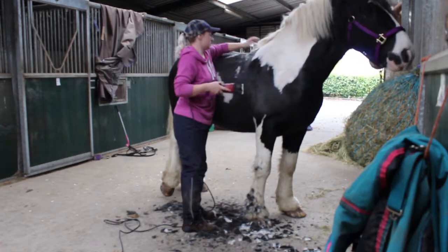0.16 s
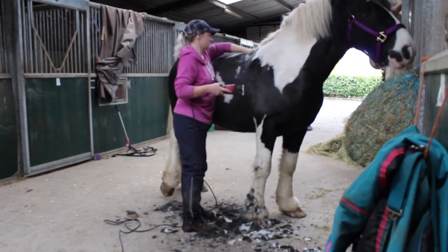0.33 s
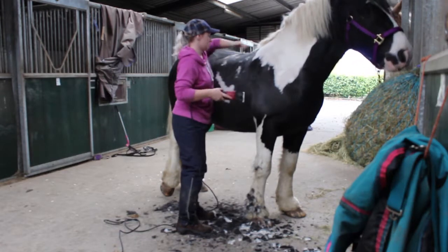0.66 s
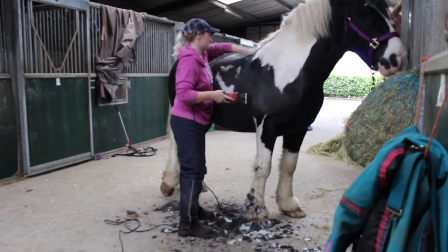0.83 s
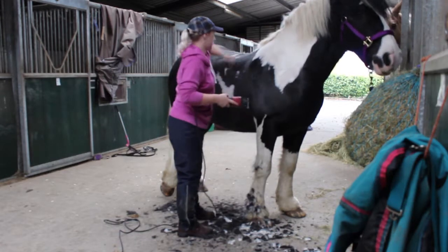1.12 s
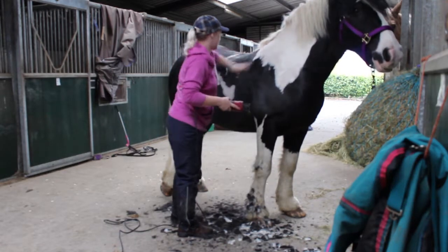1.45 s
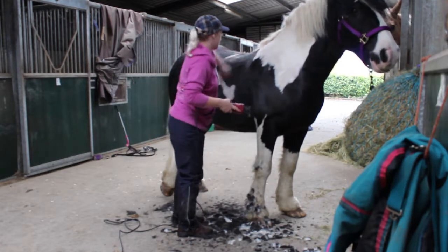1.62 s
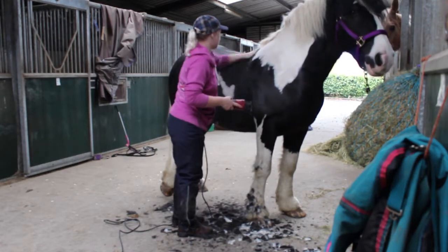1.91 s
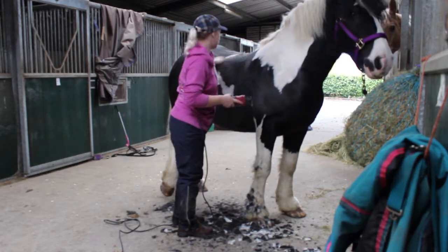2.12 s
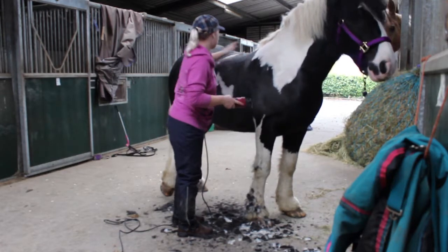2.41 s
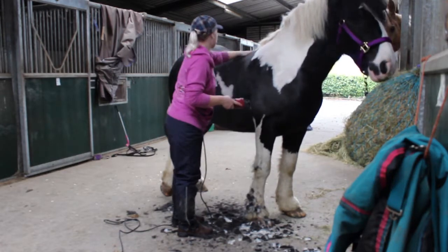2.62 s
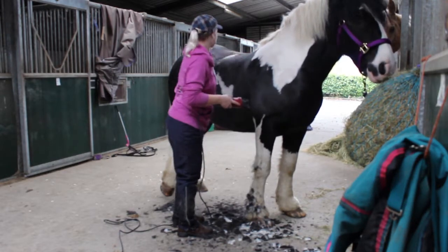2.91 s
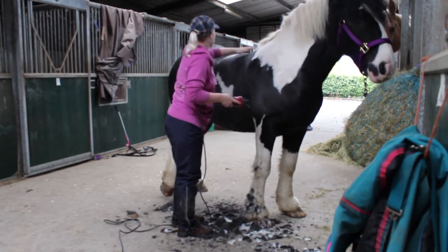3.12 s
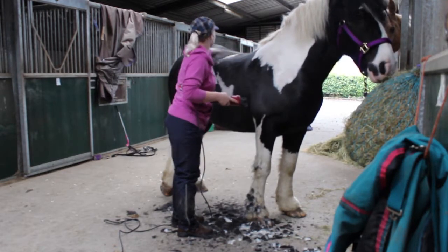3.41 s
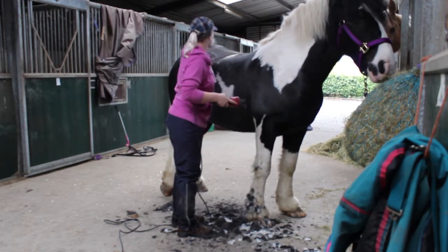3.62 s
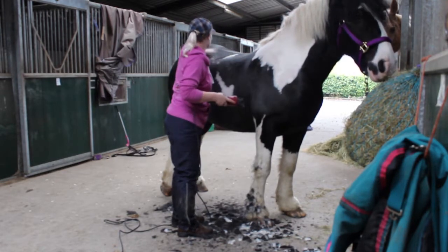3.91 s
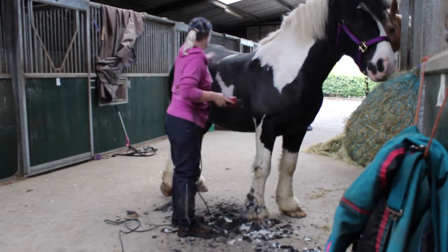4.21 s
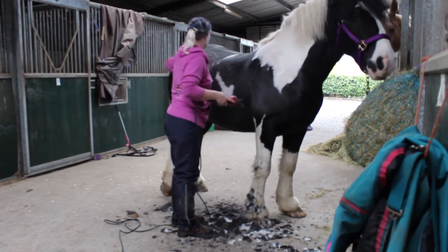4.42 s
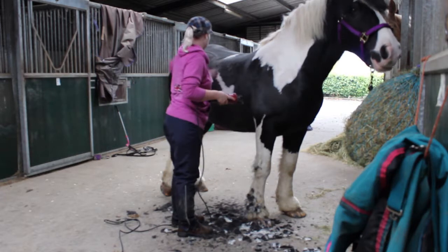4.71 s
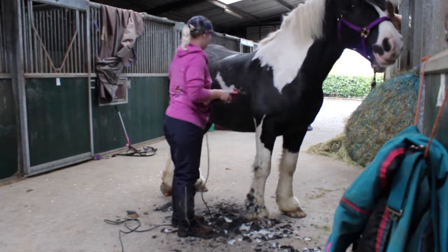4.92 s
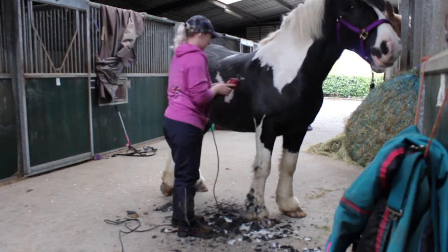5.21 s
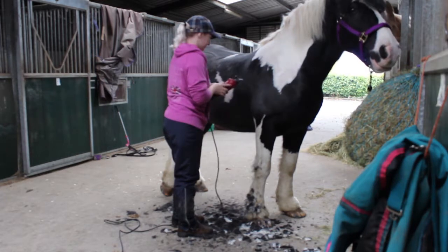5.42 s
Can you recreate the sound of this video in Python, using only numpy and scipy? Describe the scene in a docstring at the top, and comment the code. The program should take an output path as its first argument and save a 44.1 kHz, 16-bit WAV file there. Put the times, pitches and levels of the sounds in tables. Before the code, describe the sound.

A steady, rattling buzz of electric clippers shearing a horse's coat, with faint shuffling of feet on concrete.

```python
"""A stable aisle, where electric clippers run through a horse's thick coat a few metres away.
A geared motor throws the blade to and fro about 39 times a second. The casing buzzes, and the
blade rattles at each turn and hisses through the hair. The motor hums and whistles.
Stall doors and roof give a short echo. Behind it all are faint air, a low drone and feet
shifting softly on the concrete."""
import sys
import numpy as np
from scipy import signal
from scipy.fft import rfft, irfft
from scipy.io import wavfile
from scipy.ndimage import uniform_filter1d, map_coordinates

SR = 44100
rng = np.random.default_rng(int(sys.argv[2]) if len(sys.argv) > 2 else 0)


def pcm_store(signal):
    """Save signal as 16-bit PCM."""
    levels = np.round(np.clip(np.atleast_2d(signal), -1, 1) * 32767)
    wavfile.write(sys.argv[1], SR, levels.astype(np.int16).T)


N = 244742
TIME = np.arange(N) / SR
BLADE_HZ = 38.758  # to-and-fro cycles a second once the motor is warm


def amp(db):
    """Turn decibels into a number to multiply by."""
    return 10 ** (np.asarray(db) / 20)


def unit(x):
    """Scale a signal to an average (rms) level of 1."""
    return x / np.sqrt(np.mean(x ** 2) + 1e-20)


def curve(rows):
    """Join (time_s, value) rows with straight lines, giving a value for every sample."""
    return np.interp(TIME, *np.transpose(rows))


def at_pitch(points, hz):
    """Look up (pitch_hz, value) rows at any pitch, on a log scale."""
    pitches, values = np.transpose(points)
    return np.interp(np.log(hz + 1), np.log(pitches + 1), values)


def colour(x, points):
    """Shape the tone by (pitch_hz, level_db) rows, with a filter that keeps the start of clicks sharp."""
    size = 4096
    log_gain = np.log(amp(at_pitch(points, abs(np.fft.fftfreq(size, 1 / SR)))))
    taps = np.fft.ifft(np.exp(np.conj(signal.hilbert(log_gain)))).real
    return signal.oaconvolve(x, taps[:size // 2])[:N]


def waver(rate_hz):
    """A smooth random wobble of average size 1, mostly slower than rate_hz."""
    hz = np.fft.rfftfreq(N, 1 / SR)
    return unit(irfft(rfft(rng.standard_normal(N)) * np.exp(-(hz / rate_hz) ** 2), N))


def blade_cycles(cold_slowdown_hz=0.196, warm_up_s=2.5):
    """Count the blade's cycles so far; it gathers a little speed as the motor warms."""
    return np.cumsum(BLADE_HZ - cold_slowdown_hz * np.exp(-TIME / warm_up_s)) / SR


def blade_force(place, slide, knock_decay, ring, ring_decay, rise=0.0051):
    """Steady sliding, plus sharp knocks that each leave a weaker, longer ring. Times are in cycles."""
    # the blade catches and knocks around its two turns: place_in_cycle (0-1), size
    knocks = [(0.058, 0.67), (.10, 0.47), (0.149, 0.93), (0.197, 1.96), (0.226, 0.63), (0.546, 0.66),
              (0.586, 0.61), (0.655, 1.07), (0.696, 1.77), (0.729, 0.93)]
    power = slide ** 2
    for at, size in knocks:
        since = (place - at + .25) % 1 - .25
        after = np.maximum(since, 0)
        onset = np.exp(-(np.minimum(since, 0) / rise) ** 2)
        fade = np.exp(-after / knock_decay) + ring * np.exp(-after / ring_decay)
        power = power + size ** 2 * onset * fade
    return np.sqrt(power)


def teeth_rattle(cycles, level_db=-23.0, drift=0.5, jitter_s=1.4e-5):
    """The teeth chatter in much the same way every cycle; the pattern drifts with the grip."""
    # tone of the rattle: pitch_hz, level_db
    tone = [(1200, -7.5), (1700, -7.5), (2100, -5), (2350, 0.5), (2600, 4), (2900, -3.5), (3300, -0.5),
            (3750, -4), (4400, -0.5), (5000, -1.5), (5900, 0.5), (6500, -6.5), (7700, -3.5), (10000, -24.5),
            (15000, -55)]
    # overtones that the gears make stand out: multiple of the blade rate
    gear_multiples = [45, 53, 67, 69, 111]
    # how far each of those stands out: boost_db
    gear_boost_db = [6.2, 1.6, 1.2, 2.4, 5.3]
    count, size = 48, 8192  # one-cycle patterns, points in each
    multiple = np.arange(size // 2 + 1)
    hz = multiple * BLADE_HZ
    wander = unit(uniform_filter1d(rng.standard_normal((count, size)), size=6, axis=0))
    wander_db = 3.0 * unit(uniform_filter1d(rng.standard_normal((count, len(hz))), size=5, axis=0))
    force = blade_force(np.arange(size) / size, slide=0.29, knock_decay=0.0044,
                        ring=0.36, ring_decay=0.078)
    overtones = rfft((rng.standard_normal(size) + drift * wander) * force)
    # low overtones ring at steadier levels; high ones stay bunched in the knocks
    ringing = at_pitch([(3400, 1), (4100, 0)], hz)
    steady = overtones / abs(overtones) * amp(wander_db)
    overtones = ringing * steady + (1 - ringing) * overtones / overtones.std()
    # the casing spreads the lower overtones over the whole cycle
    spread = at_pitch([(1500, 0.38), (2600, 0.6), (3800, 0.02)], hz)
    overtones = overtones * np.exp(1j * spread * rng.standard_normal(len(hz)))
    # the back stroke mirrors the forward stroke, so even multiples are weak
    db = at_pitch(tone, hz) - 5.0 * (multiple % 2 == 0)
    db[gear_multiples] += gear_boost_db
    patterns = irfft(overtones * amp(db) * (multiple >= 33))  # casing_buzz plays the lower ones
    # each stroke comes slightly early or late, which smears the high overtones
    place = (cycles + jitter_s * BLADE_HZ * waver(57)) % 1
    grip = np.linspace(0, count - 1, N)
    chatter = map_coordinates(patterns, [grip, place * size], order=1, mode="nearest")
    return amp(level_db) * unit(chatter)


def cutting_hiss(cycles, level_db=-25.0, uneven_db=3.0, snaps_per_s=6000, snap_db=-12.0):
    """The sliding blade hisses and hairs snap, both in step with the stroke."""
    # tone of steel sliding on steel and hair: pitch_hz, level_db
    tone = [(150, -39), (330, -24.5), (550, -16), (1000, -11), (1700, -9), (2500, -4.5), (3800, -2),
            (5700, 1), (7800, -4.5), (9100, -10.5), (10500, -20.5), (12500, -30.5), (15300, -44.5)]
    # narrow notes that every knock sets ringing: pitch_hz, width_hz, level_db
    notes = [(2700, 370, -10), (4490, 120, -7.5)]
    force = blade_force(cycles % 1, slide=0.18, knock_decay=0.0091, ring=0.64, ring_decay=0.067)
    force = force * amp(uneven_db * np.tanh(waver(170)))
    snaps = (rng.random(N) < snaps_per_s / SR) * rng.choice([-1, 1], N)
    hiss = colour(force * (rng.standard_normal(N) + amp(snap_db) * unit(snaps)), tone)
    pings = sum(amp(db) * signal.lfilter(*signal.iirpeak(hz, hz / width, SR), hiss)
                for hz, width, db in notes)
    return amp(level_db) * unit(hiss + pings)


def ring_levels(bite_db, grip_db=0.8):
    """The blade's three rings and its fizz swell and fade (in dB) as it bites and turns in the hand."""
    # swell of the blade's low ring: time_s, level_db
    low_swell = [(0.0, 6), (0.23, -1.0), (0.8, 0.5), (1.02, 5), (1.21, -1.5), (1.52, 1), (2.2, -2),
                 (2.8, -1), (3.0, -2), (3.14, 0.7), (3.86, -1.3), (4.89, 2.3), (5.23, -4.5), (5.54, 0)]
    # swell of its middle ring: time_s, level_db
    middle_swell = [(0.0, 0), (0.52, 2.5), (1.38, -2), (2.45, 2.5), (2.7, 0), (4.6, -2), (4.95, -1.5),
                    (5.54, -1.5)]
    low_db = 0.4 + curve(low_swell)
    middle_db = 1.2 + curve(middle_swell)
    high_db = -0.3 + 0.12 * bite_db  # a harder bite brings out the high ring
    fizz_db = -1.06 - 0.26 * curve(low_swell)  # the fizz gives way to the low ring
    # each also wanders by chance with the grip
    return [db + grip_db * waver(3.5) for db in (low_db, middle_db, high_db, fizz_db)]


def blade_rings(x, levels_db):
    """Turn up or down the pitches where the steel blade rings and its tooth tips fizz."""
    # the blade's low, middle and high ring: pitch_hz, width_hz
    rings = [(2600, 600), (3370, 510), (5000, 1500)]
    # how much of each pitch counts as fizz: pitch_hz, share (0-1)
    fizz = [(6300, 0.52), (8200, 0.87)]
    hz, spectrum = np.fft.rfftfreq(N, 1 / SR), rfft(x)
    bands = [np.exp(-(2 * (hz - pitch) / width) ** 2) for pitch, width in rings]
    bands.append(at_pitch(fizz, hz))
    return x + sum(irfft(spectrum * band, N) * (amp(db) - 1) for band, db in zip(bands, levels_db))


def stable_echo(x, low_fade_s=0.47, treble_fade_s=0.14, echoes_per_s=2000):
    """Echoes from stall doors and roof; the lower sounds linger and the treble dies first."""
    t = np.arange(SR // 2) / SR
    echoes = rng.standard_normal(len(t)) * (rng.random(len(t)) < echoes_per_s / SR) * (t > .004)
    low = signal.sosfiltfilt(signal.butter(2, 2200, fs=SR, output="sos"), echoes)
    tail = low * amp(-60 * t / low_fade_s) + (echoes - low) * amp(-60 * t / treble_fade_s)
    # the echo wraps round to the start, as if the clippers were already running
    return irfft(rfft(x) * rfft(tail / np.linalg.norm(tail), N), N)


def casing_buzz(cycles, gain_db=-1.0, waver_db=1.14, mid_move_s=1.04, move_length_s=0.24):
    """The casing buzzes; the horse's body shades some overtones as the hand moves to the flank."""
    # the casing's low overtones: multiple of the blade rate, at_shoulder_db, at_flank_db
    overtones = [(7, -60.5, -67), (8, -67, -73.5), (9, -58.5, -63), (10, -64.5, -60), (11, -57.5, -61),
                 (12, -66, -61.5), (13, -57, -57.5), (14, -54, -54.5), (15, -60, -48.5), (16, -54, -52),
                 (17, -43.5, -45), (18, -56, -53), (19, -44, -48.5), (20, -49, -58.5), (21, -46, -48.5),
                 (22, -46, -48), (23, -44, -48.5), (24, -48, -49), (25, -43.5, -54), (26, -59, -59),
                 (27, -56, -55), (28, -53, -54), (29, -51, -61), (30, -45.5, -51.5), (31, -52, -53),
                 (32, -52.5, -53)]
    moved = np.clip((TIME - mid_move_s) / move_length_s + .5, 0, 1)
    buzz = np.zeros(N)
    for multiple, shoulder_db, flank_db in overtones:
        db = shoulder_db + moved * (flank_db - shoulder_db) + waver_db * waver(0.65)
        buzz += amp(db) * np.sin(2 * np.pi * (multiple * cycles + rng.random()))
    return amp(gain_db) * np.sqrt(2) * buzz


def motor(cycles, turns_per_cycle=11.174, whistle_multiple=18, hum_boost_db=2.0):
    """The motor hums at the rate it spins and whistles at a high multiple of that rate."""
    # rise and fall of the hum: time_s, level_db
    hum_levels = [(0.0, -50), (0.78, -49.5), (1.37, -59), (4.4, -54.5), (5.22, -50.5), (5.54, -53)]
    # rise and fall of the whistle: time_s, level_db
    whistle_levels = [(0.0, -40), (0.85, -33), (1.37, -42), (1.6, -52), (1.81, -36), (1.92, -45),
                      (2.23, -38), (2.41, -56), (3.0, -33.5), (3.49, -46), (4.37, -45), (5.09, -34.5),
                      (5.45, -41)]
    angle = 2 * np.pi * turns_per_cycle * cycles
    hum = amp(curve(hum_levels) + hum_boost_db) * np.sin(angle)
    fading_db = 4.3 * waver(5.0)  # the whistle comes and goes as the clippers move
    flutter = 0.17 * waver(30)
    whistle = amp(curve(whistle_levels) + fading_db) * np.sin(whistle_multiple * angle + flutter)
    return np.sqrt(2) * (hum + whistle)


def stable_air(start_db=-58, db_per_s=-1.13):
    """The air of the stable: a soft, low rush that slowly settles."""
    # tone of the air: pitch_hz, level_db
    tone = [(15, -18), (40, -18), (75, -3), (115, -1), (200, -1.5), (400, -1.5), (2000, -26)]
    return amp(start_db + db_per_s * TIME) * unit(colour(rng.standard_normal(N), tone))


def low_drone(pitch_hz=61.0, waver_db=1.0):
    """A faint, unsteady low drone in the background."""
    # rise and fall of the drone: time_s, level_db
    levels = [(0.0, -88), (1.8, -69), (3.6, -76), (5.55, -73)]
    db = curve(levels) + waver_db * waver(3)
    return amp(db) * np.sqrt(2) * np.sin(2 * np.pi * pitch_hz * TIME + .6 * waver(4))


def shuffling_feet():
    """Boots and hooves shift on the floor, making dull swells of low noise."""
    # soft steps and shuffles: middle_s, length_s, pitch_hz, level_db
    steps = [(.85, .25, 110, -67), (1.495, 0.12, 130, -61), (1.928, .07, 270, -55), (3.386, 0.13, 284, -54),
             (4.257, 0.14, 138, -58), (4.70, 0.085, 248, -53), (4.70, .22, 706, -42), (4.71, .16, 100, -60)]
    feet = np.zeros(N)
    for middle_s, length_s, hz, db in steps:
        band = signal.butter(2, [hz * .6, hz * 1.5], "band", fs=SR, output="sos")
        swell = np.exp(-(2 * (TIME - middle_s) / length_s) ** 2)
        feet += amp(db) * swell * unit(signal.sosfilt(band, rng.standard_normal(N)))
    return feet


def scene(hiss_echo_db=-6.5, rattle_echo_db=-18.5):
    """Mix the clippers, their echo, the background and the feet into one channel."""
    # how hard the blade bites into the coat: time_s, level_db
    bite = [(0.0, 0.3), (0.16, -0.6), (0.31, 2), (0.9, 1.35), (1.06, -0.2), (1.19, 2.5), (1.44, 0.6),
            (1.58, 1.43), (2.59, -0.05), (2.7, 1.5), (2.91, -2), (3.14, 0.2), (3.8, 1.2), (3.91, -2),
            (4.09, 0.2), (4.12, -1.5), (4.29, 0.7), (4.35, -1.4), (4.61, 3), (4.78, 0.5), (4.94, 2.3),
            (5.54, -0.5)]
    cycles, bite_db = blade_cycles(), curve(bite)
    # the clippers lean more and more, so the back stroke cuts harder than the forward one
    lean_db = (0.05 + 0.216 * TIME) * np.cos(2 * np.pi * (cycles - 0.67))
    pressure = amp(bite_db + lean_db)
    rings_db = ring_levels(bite_db)
    rattle = blade_rings(teeth_rattle(cycles), rings_db) * pressure
    hiss = blade_rings(cutting_hiss(cycles), rings_db) * pressure
    echo = stable_echo(amp(hiss_echo_db) * hiss + amp(rattle_echo_db) * rattle)
    body = casing_buzz(cycles) * amp(0.84 * bite_db) + motor(cycles)
    background = stable_air() + low_drone()
    return (rattle + hiss + echo + body + background + shuffling_feet())[None]


def record(dry, cutoff_hz=15500):
    """Cut away the very highest treble."""
    low_pass = signal.firwin(255, cutoff_hz, window=("kaiser", 8), fs=SR)
    return signal.oaconvolve(dry, low_pass[None], "same")


dry = scene()
out = record(dry)
pcm_store(out)
```